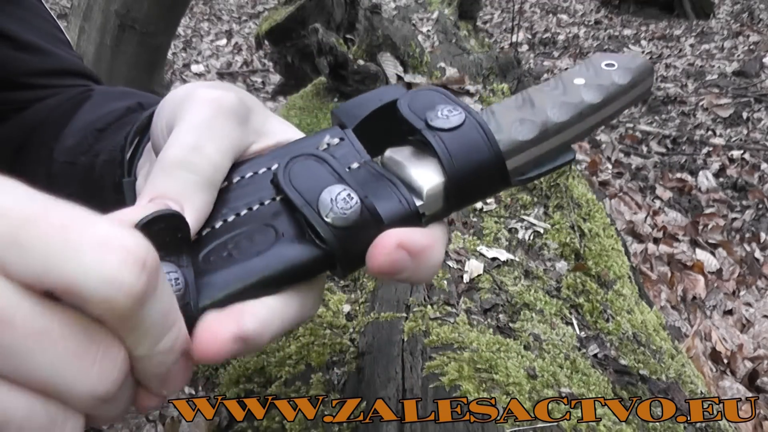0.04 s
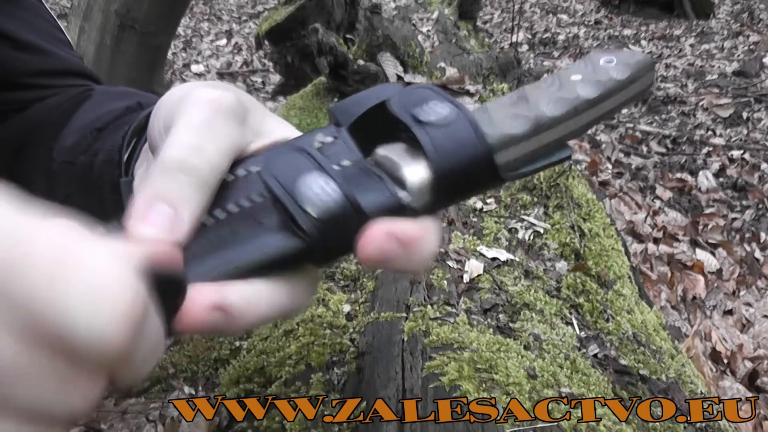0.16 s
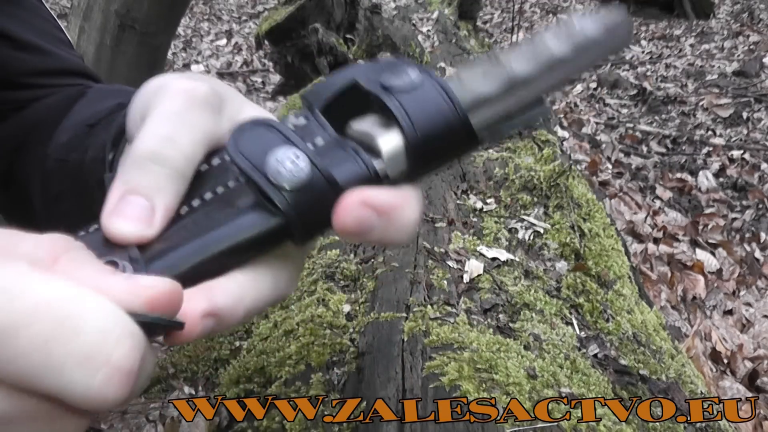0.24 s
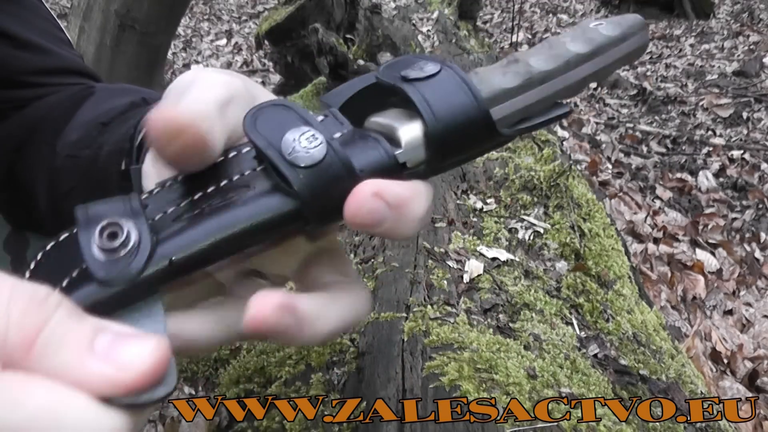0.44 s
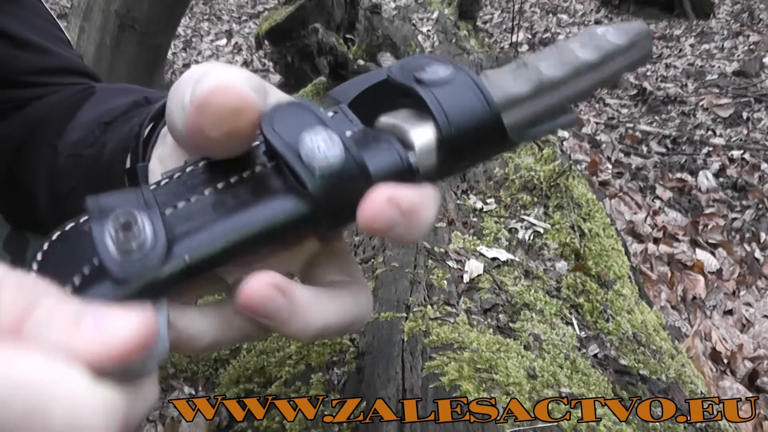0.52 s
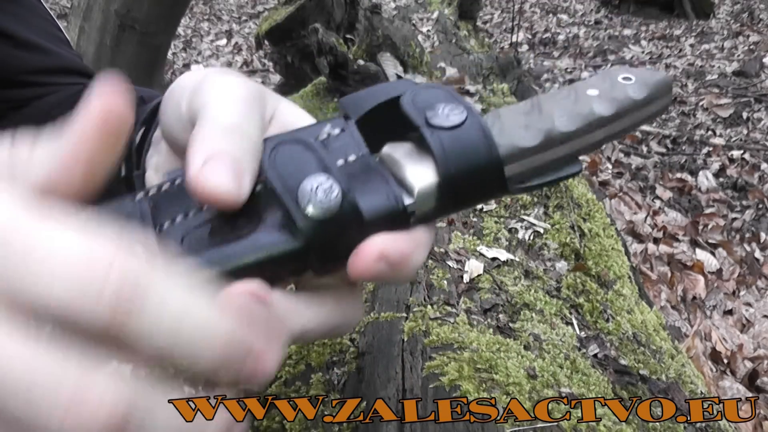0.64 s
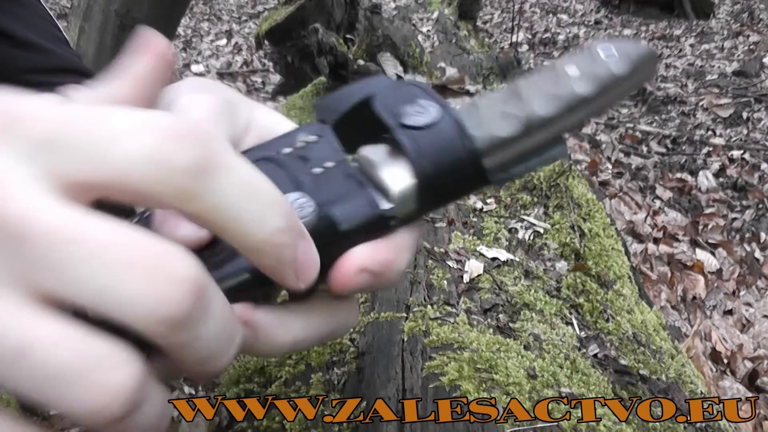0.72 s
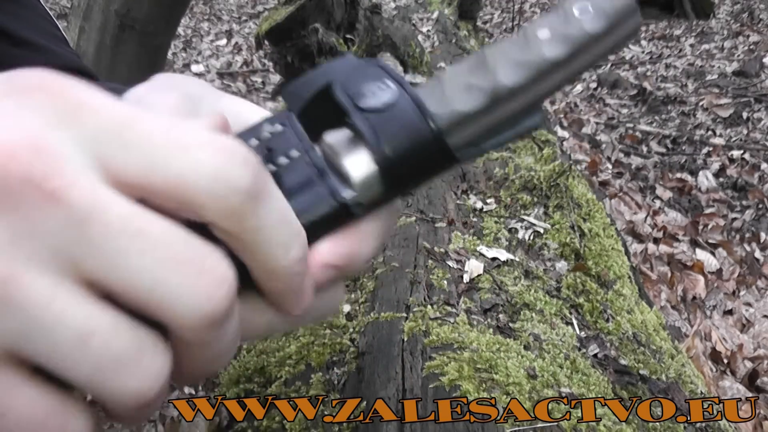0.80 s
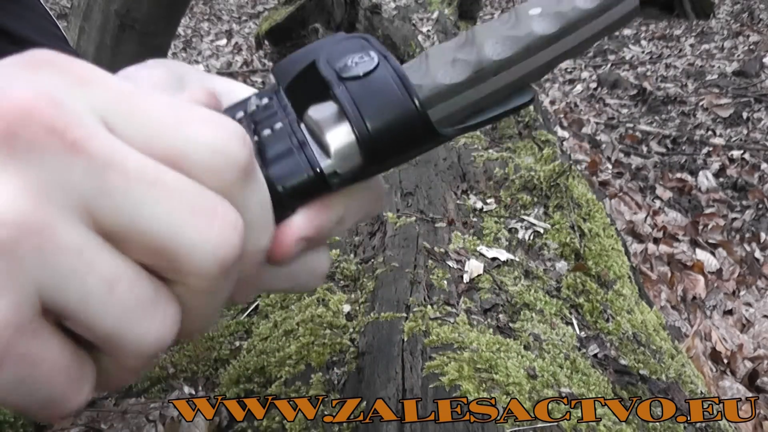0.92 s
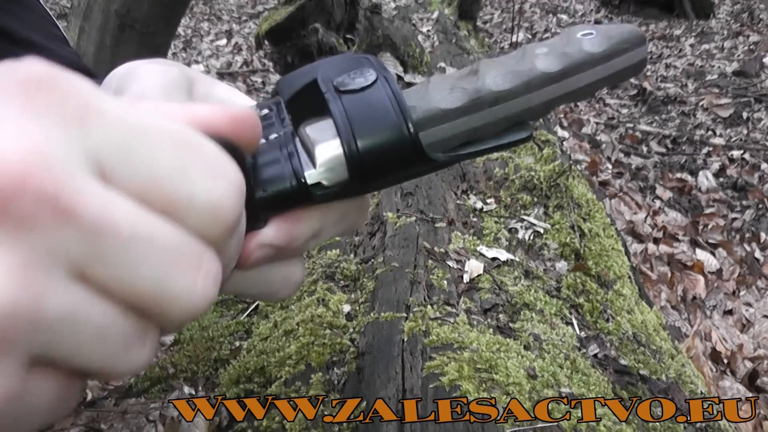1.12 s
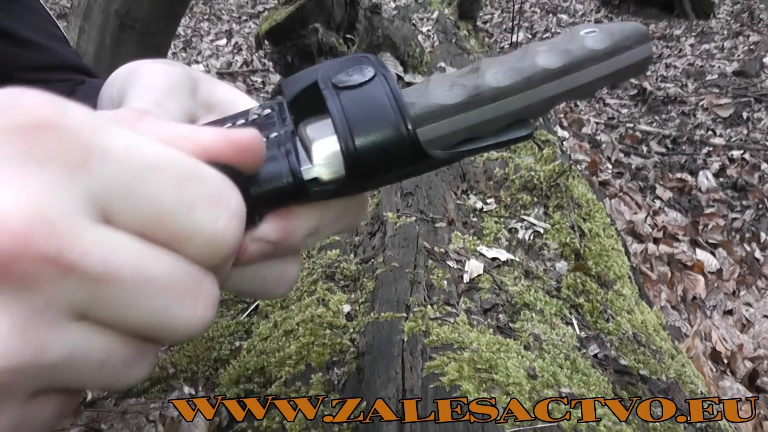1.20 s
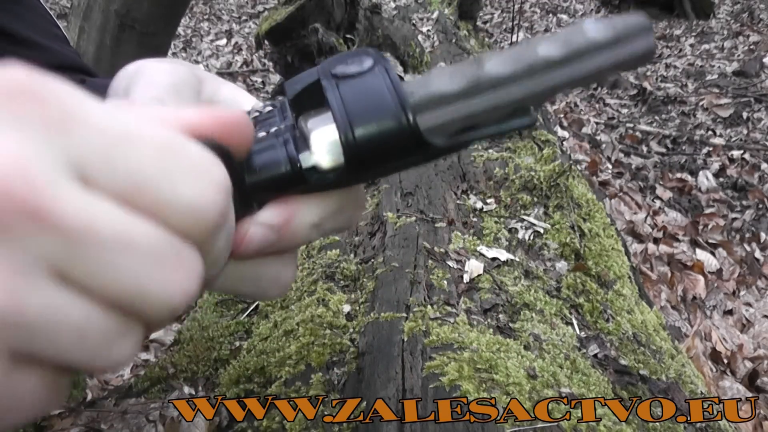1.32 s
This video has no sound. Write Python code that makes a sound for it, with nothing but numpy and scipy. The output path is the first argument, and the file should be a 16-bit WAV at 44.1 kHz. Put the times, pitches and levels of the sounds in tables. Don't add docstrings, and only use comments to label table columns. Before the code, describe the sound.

A leather sheath's press stud is opened by hand, very close. After faint knocks and ticks, it pops at about 0.22 seconds, sharp, metallic and quickly damped, with a dull leather thud. Smaller clicks follow near 0.45, a crisp rattling cluster at 0.61 to 0.65, then scattered ticks, knocks and soft scrapes until a last click near 1.35. Quiet leaf hiss and a very faint low hum lie behind.

```python
import sys
import numpy as np
from scipy import signal
from scipy.io import wavfile
from scipy.ndimage import uniform_filter1d

SR = 44100
rng = np.random.default_rng(int(sys.argv[2]) if len(sys.argv) > 2 else 0)


def gain_from_db(level_db):
    decades = np.asarray(level_db, float) / 20
    return 10 ** decades


def log_audio(samples):
    frames = np.atleast_2d(samples).T
    limited = np.clip(frames, -1, 1)
    pcm = np.round(limited * 32767).astype(np.int16)
    wavfile.write(sys.argv[1], SR, pcm)


N = 59535

# (frequency [Hz], level [dB])
TICK_COLOUR = [(600, -22), (1500, -12), (3000, -7), (4800, -1), (6500, 0), (9000, -5), (12500, -16),
               (16500, -30)]


def evened(x):
    return x / np.sqrt(np.mean(x ** 2) + 1e-20)


def read(points, hz):
    f, value = np.transpose(points)
    return np.interp(np.log(hz + 1), np.log(f + 1), value)


def add(mix, s, sound):
    part = mix[:, max(round(s * SR), 0):][:, :sound.shape[1]]
    part += sound[:, :part.shape[1]]


def panned(x, db):
    return x * gain_from_db([[db / 2], [-db / 2]])


def coloured(x, points):
    log_gain = np.log(gain_from_db(read(points, abs(np.fft.fftfreq(2048, 1 / SR)))))
    min_phase = -signal.hilbert(log_gain).imag
    taps = np.fft.ifft(np.exp(log_gain + 1j * min_phase)).real[:512]
    taps /= np.linalg.norm(taps)
    return signal.oaconvolve(x, taps[None], axes=1)[:, :x.shape[1]]


def resonate(x, hz, width_hz):
    r = np.exp(-np.pi * width_hz / SR)
    return signal.lfilter([1, 0, -1], [1, -2 * r * np.cos(2 * np.pi * hz / SR), r * r], x)


def pair(size, spread):
    z = rng.standard_normal((3, size))
    return z[0] + spread * z[1:]


def air():
    # (frequency [Hz], level [dB])
    hiss_colour = [(15, -33), (25, 11), (568, 4), (1600, -1), (1780, -2), (3060, -6.5), (6380, -5),
                   (14400, -24.5), (16500, -39)]
    # (frequency [Hz], left-right correlation [-1 to 1])
    likeness = [(60, -0.0078), (180, -0.53), (550, 0.113), (1650, 0.433), (4970, 0.925), (15000, -0.23)]
    hiss_db, patch_db, flicker_db = -55, 1.0, 0.4
    hum_hz, hum_width_hz, hum_db = 103.7, 8.1, -69.5
    frames, hz = N // 128 + 5, np.fft.rfftfreq(1024, 1 / SR)
    a, b, c, d, patches = rng.standard_normal((frames, 513, 5)).T
    patches = uniform_filter1d(patches, size=14, axis=0)
    patches = evened(uniform_filter1d(patches, size=12, axis=1))
    same = np.clip(read(likeness, hz), -1, 1)[:, None]
    left, other = a + 1j * b, c + 1j * d
    right = same * left + np.sqrt(1 - same ** 2) * other
    z = np.array([left, right]) * gain_from_db(read(hiss_colour, hz)[:, None] + patch_db * patches)
    hiss = evened(signal.istft(z, nperseg=1024, noverlap=768)[1][:, :N])
    flicker = evened(uniform_filter1d(rng.standard_normal(N), size=300))
    hum = evened(resonate(rng.standard_normal((2, N)), hum_hz, hum_width_hz))
    return gain_from_db(hiss_db + flicker_db * flicker) * hiss + gain_from_db(hum_db) * hum


def knock(db, hz, length):
    rough_share = 0.3
    t = np.arange(1200) / SR
    swell = t / length * 3
    shape = swell * np.exp(1 - swell)
    rough = evened(resonate(pair(len(t), 0.23), hz * 1.196, hz * 1.14))
    return gain_from_db(db) * shape * (np.sin(2 * np.pi * hz * t) + rough_share * rough)


def leather_knocks():
    # (time [s], level [dB], pitch [Hz], length [s])
    knocks = [(0, -41.5, 633, 0.00246), (.008, -42.5, 634, 0.00227), (0.037, -45, 696, 0.0023),
              (0.233, -58, 480, 0.0048), (.284, -34.5, 1237, 0.00071), (0.336, -51, 578, 0.0091),
              (0.369, -41.5, 1903, 0.000794), (0.435, -44, 986, 0.00295), (0.4385, -42.5, 464, 0.00272),
              (0.453, -47.5, 1307, 0.0039), (0.509, -41.5, 1029, 0.00259), (0.5127, -42, 597.5, 0.00331),
              (0.505, -56.5, 435, 0.00516), (.609, -44.5, 669.7, 0.00804), (0.614, -43.5, 639, 0.0058),
              (0.6385, -41, 914, 0.004), (0.651, -55.5, 1169, 0.0092), (0.735, -51, 818, 0.00547),
              (0.776, -40.5, 1716, 0.000735), (0.86, -47.5, 607, 0.0043), (0.875, -50, 623, 0.0135),
              (0.924, -46.5, 1242, 0.00356), (1.012, -49, 3960, 0.0099), (1.054, -45, 1740, .004),
              (1.055, -41, 761, 0.00323), (1.079, -53, 604.5, 0.011), (0.45, -38, 2123, 0.00158),
              (1.297, -44.5, 423, 0.0016)]
    out = np.zeros((2, N))
    for s, db, hz, length in knocks:
        add(out, s, knock(db, hz, length))
    return out


def tick(db, hz):
    creep_s, t60, spike_db = 0.0009, 0.011, 3
    ring_width_hz, ring_db, trim_db, pan_db = 2600, -4, 1, 2
    t = np.arange(900) / SR - creep_s
    fizz = gain_from_db(spike_db * rng.standard_normal(len(t))) * pair(len(t), 0.35)
    creep, decay = gain_from_db(-4 + 14 * t / creep_s), gain_from_db(-60 * t / t60)
    burst = fizz * np.where(t < 0, creep, decay)
    burst[:, np.argmax(t >= 0)] = gain_from_db(20 + 0.5 * (db + 24))
    ring = resonate(resonate(burst, hz, ring_width_hz), hz, ring_width_hz)
    colour = np.array(TICK_COLOUR) * [(hz / 6000) ** 0.6, 1]
    sound = evened(coloured(burst, colour)) + gain_from_db(ring_db) * evened(ring)
    return panned(gain_from_db(db + trim_db) * sound / abs(sound).max(), pan_db)


def strap_ticks():
    # (time [s], peak level [dB], centre [Hz])
    ticks = [(0.088, -46, 4590), (0.173, -47.5, 4740), (0.2391, -28.5, 6700), (0.2488, -28.5, 7040),
             (0.2534, -44.5, 7270), (0.2612, -39, 9000), (0.273, -39, 9800), (0.2841, -30.5, 8800),
             (0.303, -39.5, 5570), (0.3144, -44, 4850), (0.354, -44, 6050), (0.4328, -29, 4750),
             (0.4492, -26.5, 5650), (0.4757, -52.5, 9000), (0.5887, -44.5, 4530), (0.609, -27.5, 9950),
             (0.6169, -32.5, 8000), (0.6275, -20.5, 8300), (0.6316, -36, 5900), (0.6524, -33.5, 4470),
             (0.6976, -32.5, 8500),
             (0.7363, -33.5, 4670), (0.7426, -40, 6000), (0.747, -37, 8630), (0.7639, -45, 5060),
            (0.7739, -41, 5050), (0.8165, -50.5, 7660), (0.86, -41.5, 6540), (0.88, -38, 8640),
            (0.8871, -43.5, 4450), (0.9242, -34, 7060), (0.9525, -40.5, 3500), (0.966, -42.5, 4150),
            (0.9749, -38.5, 7150), (1.0165, -34.5, 6100), (1.0402, -41.5, 5450), (1.054, -31, 5770),
            (1.0754, -34.5, 6580), (1.0881, -38.5, 4280), (1.104, -43.5, 5440), (1.2055, -37, 5630),
            (1.223, -46, 6160), (1.2613, -34, 5920), (1.283, -44, 3830), (1.3166, -40.5, 4600),
            (1.3468, -28, 6700),
             (0, -33, 2660),
        (.2650, -30, 9100),
        (0.2677, -30.5, 6190),
        (0.5038, -42, 8450),
        (0.507, -42.5, 6010),
        (0.638, -19, 8640),
        (0.7089, -36.5, 6700),
        (1.298, -40, 1850),
             (0.2328, -33.5, 10000), (0.2389, -32, 9500), (0.264, -30, 9000), (0.2822, -38, 9400),
              (0.2934, -52, 9000), (0.4346, -49.5, 4200), (0.449, -23, 4770), (.455, -52, 7500),
              (0.472, -51, 6000), (0.6113, -33, 12200), (.6198, -40.5, 9000), (.6235, -37.5, 6000),
              (0.6329, -31, 6200), (0.6433, -33, 9100), (0.6492, -27, 6140), (0.6528, -29, 10160),
              (0.6594, -44, 6340), (0.7006, -32, 7020)]
    out = np.zeros((2, N))
    for s, db, hz in ticks:
        add(out, s, tick(db, hz))
    return out


def scrapes():
    # (start [s], length [s], level [dB])
    strokes = [(0.226, 0.016, -50), (0.267, 0.0207, -50), (0.293, 0.0214, -65), (0.614, 0.0195, -71.5),
               (0.622, 0.0136, -39), (0.636, 0.0145, -39.5), (.645, 0.01208, -39.5), (0.7, 0.0083, -52.5),
               (0.707, 0.0129, -52.5), (0.739, 0.0252, -54.5), (0.807, 0.1295, -59), (0.955, 0.0608, -53),
               (0.984, 0.0708, -51), (1.059, 0.09, -60.5), (1.109, 0.0984, -55), (1.17, 0.0952, -54.5)]
    # (frequency [Hz], level [dB])
    rub_colour = [(290, -35), (500, 0.5), (1090, -2), (2290, -11), (6560, 2.5), (8540, -6.5), (10300, -8),
                  (15800, -23), (16500, -24)]
    grains_per_s, grain_spread_db = 13000, 1.6
    crackle_per_s, crackle_spread_db, crackle_db, crackle_decay_s = 200, 4, -70, 0.000263
    t, stroke = np.arange(N) / SR, np.zeros(N)
    for start, length, db in strokes:
        stroke += gain_from_db(db) * np.sin(np.pi * np.clip((t - start) / length, 0, 1)) ** 2
    size = np.minimum(rng.exponential(1, (2, N)), 5)
    draw = rng.random((2, N))
    grains = gain_from_db(grain_spread_db * size[0]) * (draw[0] < grains_per_s / SR)
    grains = uniform_filter1d(grains, size=9)
    rub = evened(coloured(grains * pair(N, 0.566), rub_colour))
    sparse = gain_from_db(crackle_spread_db * size[1]) * (draw[1] < crackle_per_s / SR)
    sparse = signal.lfilter([1], [1, -np.exp(-1 / (crackle_decay_s * SR))], sparse)
    crackle = evened(coloured(sparse * pair(N, 0.55), TICK_COLOUR))
    return panned(stroke * rub, 0.81) + gain_from_db(crackle_db) * crackle


def stud_cap():
    # (time [s], level [dB])
    slips = [
        (0.2221, -26),
        (0.2227, -24),
        (0.2232, -21),
        (.2238, -6),
        (.2243, -3),
        (.2252, -6),
        (.2261, -9),
        (.2271, -18),
        (.2281, -15),
    ]
    # (frequency [Hz], level [dB], t60 [s], left-right [dB])
    modes = [(2311.6, -5, 0.00283, 2.5), (3160, -12.5, 0.00717, 2.5), (3979, -12, 0.0103, 0.5),
             (4474, -3, 0.00494, 4.5), (5450, -8, 0.0092, 4.5), (6403, 7, 0.0056, -1),
             (7480, 4, 0.00381, 2), (8940, -3.5, 0.005, 3.5), (9712, -2, 0.00576, 8.5),
             (10980, -11.5, 0.0059, 6), (11350, -18.5, 0.0056, -1.5), (12197, -4.5, 0.0046, -4.5),
             (13500, -8.5, 0.0056, -2.5), (15280, -11, 0.0049, -5.5)]
    cap_db, spot_db, attack_s = -11.5, 4.5, 0.000244
    drop_s, drop_db, drop_time_s = 0.2288, -14, 0.0012
    out, t = np.zeros((2, N)), np.arange(4000) / SR
    for s, db in slips:
        for hz, mode_db, t60, pan_db in modes:
            turn, apart, spot = rng.standard_normal(3)
            phase = 2 * np.pi * (hz * (t + s) + 0.218 * turn)
            phase = phase + np.array([[1], [-1]]) * 0.227 * apart * hz / 8000
            level = gain_from_db(db + cap_db + mode_db + spot_db * spot - 60 * t / t60)
            ring = level * np.minimum(t / attack_s, 1) * np.sin(phase)
            add(out, s, panned(ring, pan_db))
    dropped = np.clip((np.arange(N) / SR - drop_s) / drop_time_s, 0, 1)
    return out * gain_from_db(drop_db * dropped)


def leather_body():
    # (frequency [Hz], level [dB], t60 [s], left-right [dB], delay [s])
    modes = [(190, -19.5, 0.017, 14, 0.0011), (420, -27.5, 0.037, -10, 0), (562, -14, 0.037, -1, .00105),
             (1055, -10.5, 0.0155, 1, 0.0014), (1568, -16.5, 0.012, 8, .0)]
    knock_s, attack_s = 0.2238, 0.001
    damp_s, damp_db, damp_time_s = 0.2276, -13, 0.0009
    out, t = np.zeros((2, N)), np.arange(4000) / SR
    for hz, db, t60, pan_db, delay in modes:
        start = knock_s + delay
        ring = gain_from_db(db - 60 * t / t60) * np.minimum(t / attack_s, 1) * np.sin(2 * np.pi * hz * t)
        ring *= gain_from_db(damp_db * np.clip((t + start - damp_s) / damp_time_s, 0, 1))
        add(out, start, panned(ring, pan_db))
    return out


def scene():
    return air() + leather_knocks() + strap_ticks() + scrapes() + stud_cap() + leather_body()


def roll_off(x):
    return signal.sosfilt(signal.butter(12, 17080, fs=SR, output="sos"), x)


def record(dry):
    low_cut_hz, edge_hz, edge_leak_db = 90, 16100, -15
    x = signal.sosfilt(signal.butter(2, low_cut_hz, "high", fs=SR, output="sos"), dry)
    low = signal.oaconvolve(x, signal.firwin(255, edge_hz, fs=SR)[None], "same", axes=1)
    return roll_off(low + gain_from_db(edge_leak_db) * (x - low))


dry = scene()
out = record(dry)
log_audio(out)
```